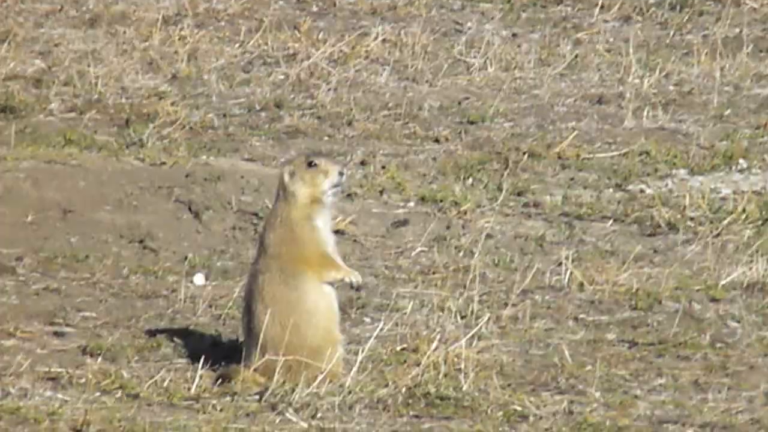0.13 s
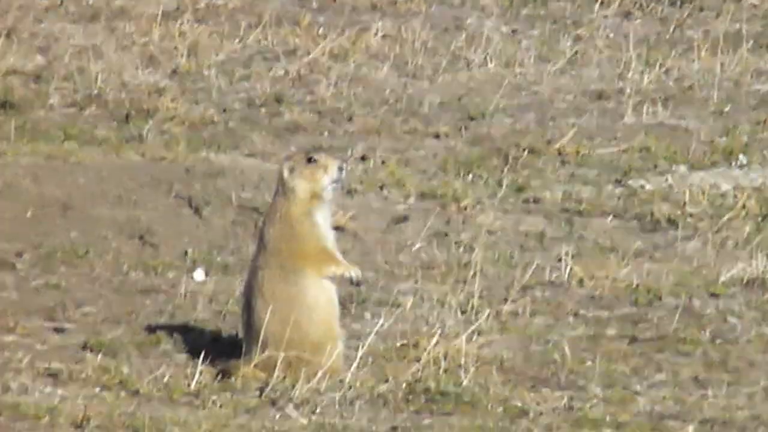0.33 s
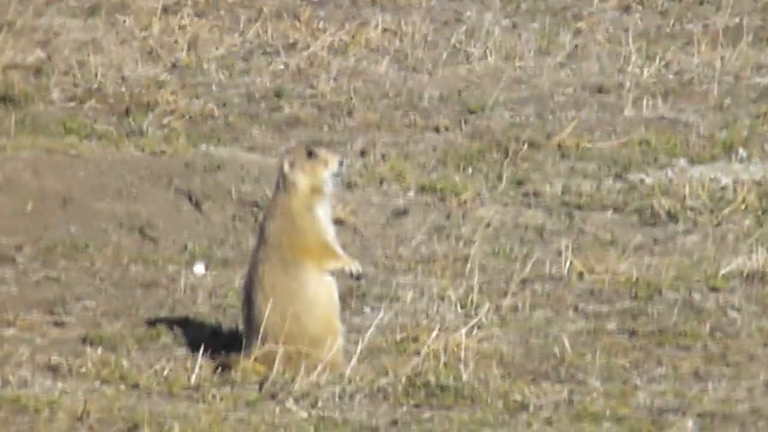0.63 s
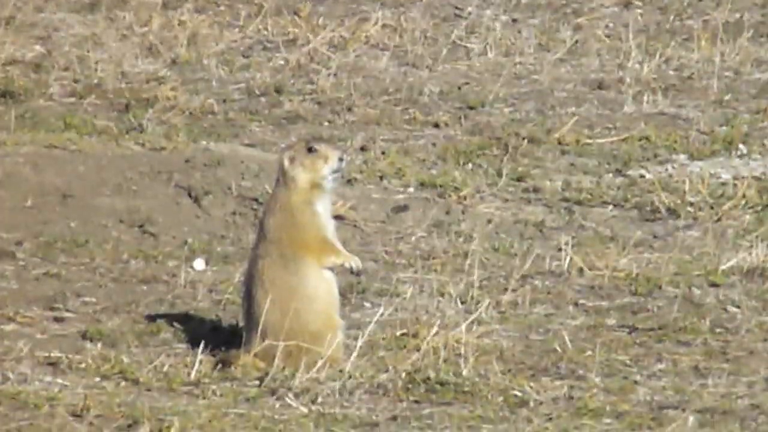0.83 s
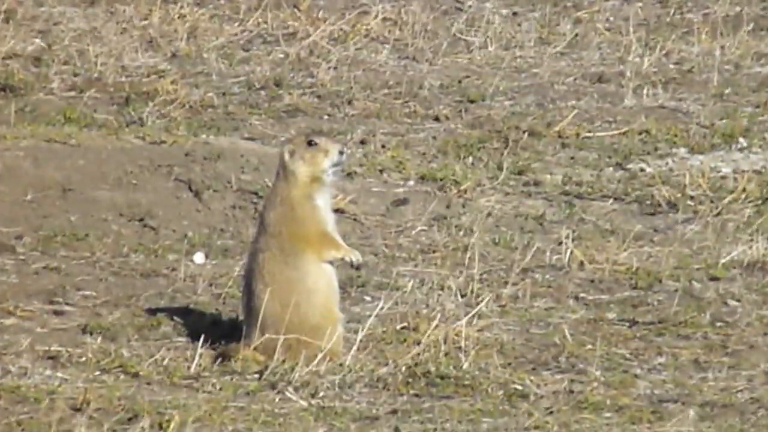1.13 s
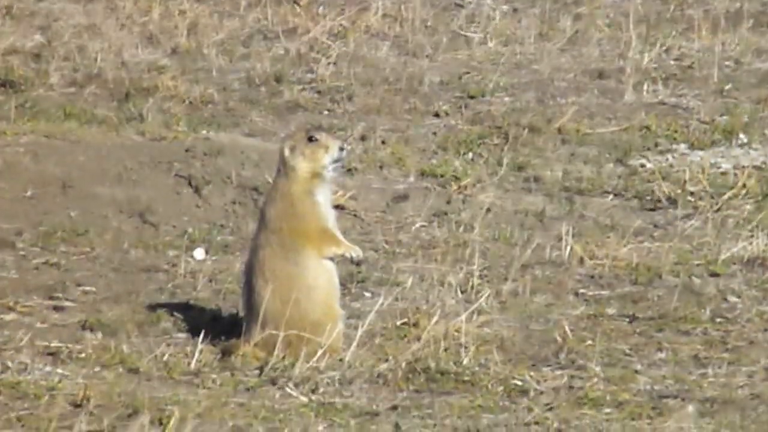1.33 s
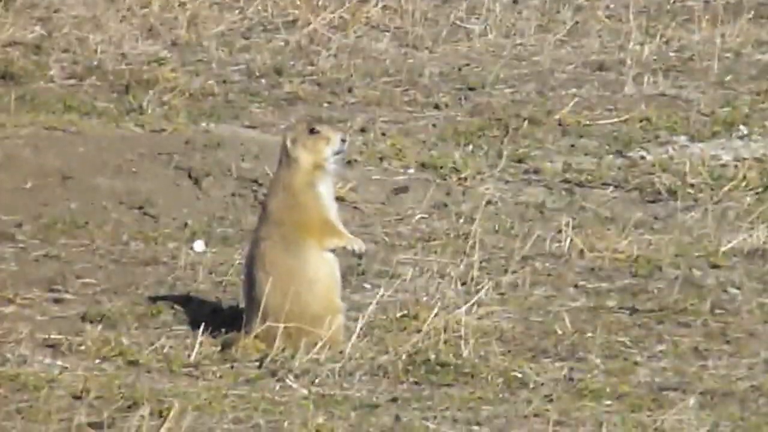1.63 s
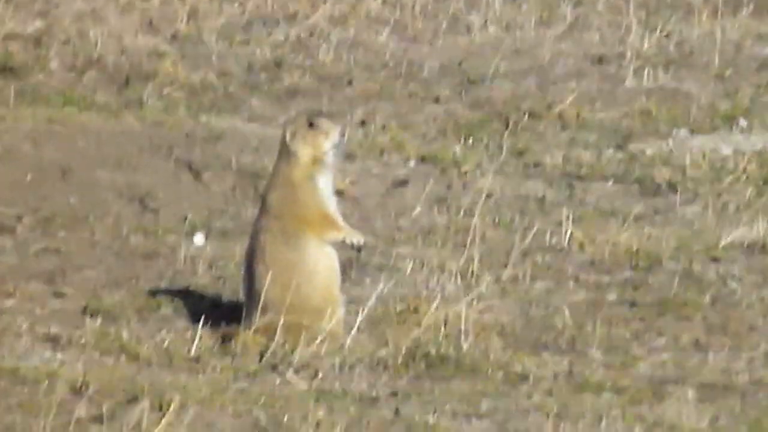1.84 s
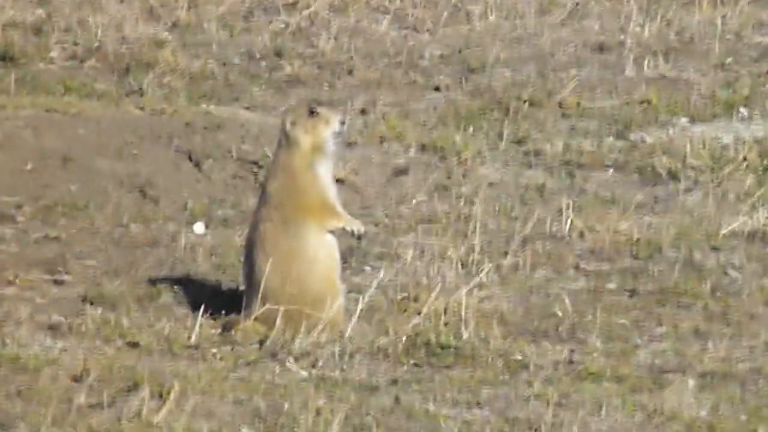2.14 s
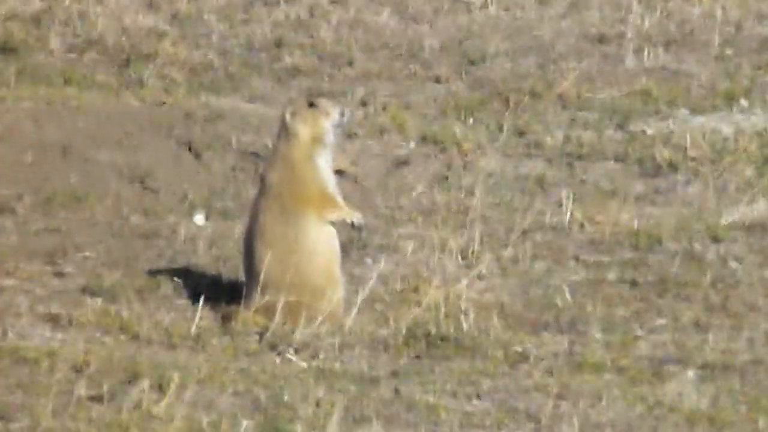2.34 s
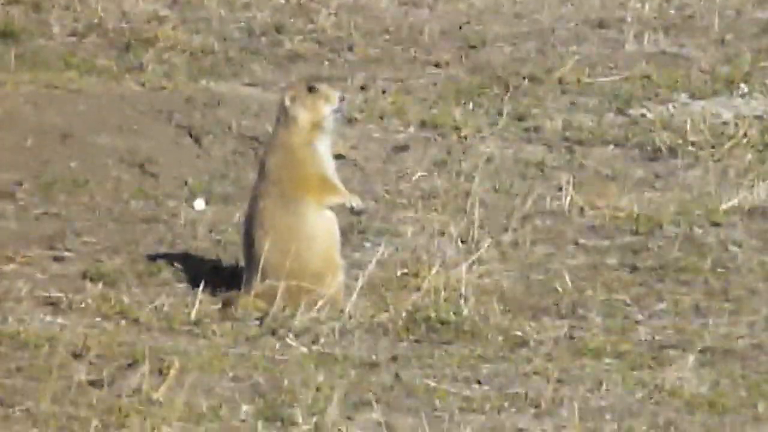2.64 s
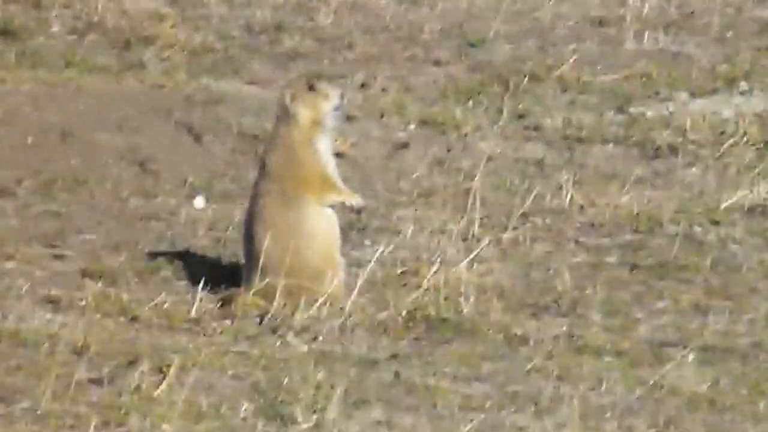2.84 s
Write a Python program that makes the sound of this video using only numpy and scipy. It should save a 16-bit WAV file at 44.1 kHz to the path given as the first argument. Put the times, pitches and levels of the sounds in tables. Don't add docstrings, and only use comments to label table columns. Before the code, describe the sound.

A prairie dog gives a single bright, yelping bark midway, after steady faint chirps from another far away; wind rumbles and hisses at a small handheld camera microphone, with little plastic handling ticks and a finger rub.

```python
import sys
import numpy as np
from scipy import signal
from scipy.fft import rfft, irfft
from scipy.io import wavfile
from scipy.ndimage import uniform_filter1d

SR = 44100
rng = np.random.default_rng(int(sys.argv[2]) if len(sys.argv) > 2 else 0)


def materialize(psi):
    bounded = np.clip(np.atleast_2d(psi).T, -1, 1)
    quanta = np.round(bounded * 32767).astype(np.int16)
    wavfile.write(sys.argv[1], SR, quanta)


def invert_db(level):
    return 10 ** (np.asarray(level, dtype=float) / 20)


N = 131859


def evened(x):
    return x / np.sqrt(np.mean(abs(x) ** 2) + 1e-20)


def read(points, hz):
    f, value = np.transpose(points)
    return np.interp(np.log(hz + 1), np.log(f + 1), value)


def add(mix, s, sound):
    part = mix[round(s * SR):][:len(sound)]
    part += sound[:len(part)]


def ring(x, hz, width):
    turn = np.exp(2j * np.pi * hz * np.arange(len(x)) / SR)
    r = np.exp(-np.pi * width / SR)
    return evened((turn * signal.lfilter([1], [1, -2 * r, r * r], x / turn)).real)


def slow(size, seconds):
    span = max(int(seconds * SR), 2)
    return evened(uniform_filter1d(uniform_filter1d(rng.standard_normal(size), span), span))


def curves(table):
    cols = np.transpose(table)
    t = np.arange(cols[0][0], cols[0][-1], 1 / SR)
    return t[0], [np.interp(t, cols[0], c) for c in cols[1:]]


def phase(hz):
    return 2 * np.pi * np.cumsum(hz) / SR


def bark():
    out = np.zeros(N)
    start, turn = whistle(out)
    second_voice(out, start, turn)
    third_voice(out)
    lingering_cavities(out)
    strained_throat(out)
    return out + ground_scatter(out)


def whistle(out):
    # time in seconds, pitch in Hz, levels of the tone, second and third partial in dB.
    arch = [(1.6462, 1985, -70, -72, -66), (1.6495, 2025, -43, -52, -36), (1.657, 2140, -45, -39, -35.5),
            (1.667, 2225, -52, -33, -43), (1.674, 2275, -28.5, -44, -40), (1.688, 2300, -30, -41, -42),
            (1.697, 2400, -40, -49, -55), (1.707, 2335, -33, -45, -49), (1.714, 2240, -36, -40, -53)]
    tail = [(1.718, 2165, -41, -38, -38), (1.724, 2115, -38, -35, -44), (1.733, 2091, -39, -45, -44),
            (1.758, 2085, -39, -43.5, -42), (1.772, 2054, -38.5, -50, -56), (1.795, 2032, -42.5, -52, -50),
            (1.820, 1986, -43, -54, -59), (1.835, 1920, -56, -56, -72), (1.86, 1830, -70, -64, -85)]
    wobble, flutter_db = .003, .8
    start, (hz, *dbs) = curves(list(arch) + list(tail))
    turn = phase(hz * (1 + wobble * slow(len(hz), .0024)))
    dbs.append(dbs[2] - 15 - 5.4 * ((4 * hz - 8800) / 200) ** 2)
    for k, db in enumerate(dbs):
        level = invert_db(db + flutter_db * (k + .5) * slow(len(hz), .004))
        add(out, start, np.sqrt(2) * level * np.sin((k + 1) * turn))
    return start, turn


def second_voice(out, start, turn):
    # time in seconds, pitch in Hz, level in dB.
    second = [(1.658, 2760, -66), (1.664, 2865, -39), (1.675, 2875, -43), (1.683, 2965, -39),
              (1.691, 3050, -37), (1.699, 3160, -45), (1.712, 2950, -46)]
    sum_db = -13
    begin, (hz, db) = curves(second)
    other = phase(hz)
    first = turn[round((begin - start) * SR):][:len(other)]
    voices = np.sin(other) + invert_db(sum_db) * np.sin(other + first)
    add(out, begin, np.sqrt(2) * invert_db(db) * voices)


def third_voice(out):
    # time in seconds, pitch in Hz, level in dB, level of the sum with the first voice in dB.
    third = [(1.670, 2640, -60, -70), (1.677, 2620, -47, -52), (1.683, 2590, -32, -39),
             (1.692, 2550, -35, -33.5), (1.701, 2640, -29, -34.5), (1.706, 2600, -41, -37),
             (1.713, 2525, -33, -35), (1.719, 2480, -50, -41), (1.728, 2400, -68, -54)]
    rattle_db, double_db = 1.5, -8
    sum_hz, wander_hz = 4838, 45
    begin, (hz, db, sum_db) = curves(third)
    turn, t = phase(hz), np.arange(len(hz)) / SR
    drifts = [slow(len(t), .0017) for _ in range(3)]
    rattle = [invert_db(rattle_db * drift) for drift in drifts]
    tone = rattle[0] * np.sin(turn)
    double = invert_db(double_db) * rattle[1] * np.sin(2 * turn - 2 * np.pi * 130 * t)
    sum_tone = rattle[2] * np.sin(phase(sum_hz + wander_hz * drifts[0]))
    add(out, begin, np.sqrt(2) * (invert_db(db) * (tone + double) + invert_db(sum_db) * sum_tone))


def lingering_cavities(out):
    # start in seconds, length in seconds, frequency in Hz, level in dB.
    linger = [(1.650, .034, 6060, -44), (1.664, .032, 6500, -46), (1.654, .020, 8810, -48),
              (1.666, .016, 5770, -49), (1.672, .022, 9250, -61), (1.698, .022, 7030, -46),
              (1.664, .016, 4470, -43), (1.668, .014, 3540, -47), (1.812, .032, 2570, -55),
              (1.724, .03, 4800, -54)]
    for s, length, hz, db in linger:
        t = np.arange(0, length, 1 / SR)
        level = invert_db(db + 1.5 * slow(SR // 10, .002)[:len(t)])
        swell = np.sin(np.pi * t / length)
        add(out, s, np.sqrt(2) * level * swell * np.sin(2 * np.pi * hz * t))


def strained_throat(out):
    # time in seconds, level of the breath in dB.
    strain = [(1.655, -62), (1.666, -47), (1.686, -39), (1.700, -35), (1.712, -38), (1.720, -49),
              (1.745, -54), (1.80, -62)]
    # resonance in Hz, width in Hz, level in dB.
    throat = [(2750, 700, 0), (4790, 150, -7), (5100, 600, -4), (4400, 400, -8), (5760, 200, -13),
              (6090, 120, -13), (6490, 200, -14), (7270, 200, -17), (3450, 500, -10)]
    begin, (db,) = curves(strain)
    noise = rng.standard_normal(SR // 4)
    breath = sum(invert_db(g) * ring(noise, hz, width) for hz, width, g in throat)
    add(out, begin, invert_db(db) * breath[:len(db)])


def ground_scatter(sound):
    echo_db, echo_t60 = -17, .13
    t = np.arange(SR // 4) / SR
    taps = rng.standard_normal(len(t)) * (rng.random(len(t)) < .03)
    taps = taps * invert_db(-60 * t / echo_t60) * (t > .003)
    return invert_db(echo_db) * signal.fftconvolve(sound, taps / np.linalg.norm(taps))[:N]


def chirps():
    # start in seconds, length in seconds, pitch in Hz, level in dB, brightness in dB.
    calls = [
        (.459, .056, 1850, -44.5, -4),
        (.793, .052, 1845, -47.5, -12),
        (1.116, .045, 1840, -52, -6),
        (1.462, .04, 1840, -54, -4),
        (2.525, .065, 1790, -48, -26),
        (2.872, .055, 1830, -49, -13),
        (.896, .024, 1950, -51, -28),
    ]
    # level of a harmonic in dB, its share of the brightness as a factor.
    partials = [(0, 0), (-5, .4), (-8, .55), (1.5, 1.1), (-18, 1.1)]
    bend, edge_s = .0736, .011
    out = np.zeros(N)
    for s, length, hz, db, bright in calls:
        t = np.arange(0, length, 1 / SR)
        edge = np.clip(np.minimum(t, length - t) / edge_s, 0, 1)
        arch = 1 - bend * ((2 * t - .94 * length) / .0485) ** 2 * np.exp(bright / 20)
        turn = phase(hz * arch)
        for k, (g, share) in enumerate(partials):
            level = invert_db(db + g + share * bright + 2.4 * slow(SR // 10, .0063)[:len(t)])
            add(out, s, edge * np.sqrt(2) * level * np.sin((k + 1) * turn))
    return out


def bird():
    # time in seconds, pitch in Hz, level in dB.
    warble = [(2.845, 770, -74), (2.868, 797, -60), (2.885, 825, -67), (2.902, 845, -66), (2.920, 770, -59),
              (2.930, 765, -74), (2.945, 840, -64), (2.965, 880, -63), (2.995, 900, -60)]
    # multiple of the pitch, level in dB.
    partials = [(2, 0), (3, -5), (4, 0), (5, -8), (6, -6)]
    out = np.zeros(N)
    start, (hz, db) = curves(warble)
    turn = phase(hz)
    for k, g in partials:
        level = invert_db(db + g + 3.5 * slow(len(hz), .004))
        add(out, start, np.sqrt(2) * level * np.sin(round(k) * turn))
    return out


def snaps():
    # time in seconds, peak in dB, centre in Hz, width in Hz.
    bursts = [
        (1.655, -48, 8600, 2500),
        (.887, -54, 13800, 2000),
        (.887, -55, 5500, 3500),
        (.580, -52, 8500, 1500),
        (1.027, -50, 8400, 1500),
        (2.353, -55, 5150, 500),
        (2.352, -55, 9000, 900),
        (2.363, -54, 5200, 600),
    ]
    snap_s = .004
    out, t = np.zeros(N), np.arange(SR // 50) / SR
    for s, db, hz, width in bursts:
        envelope = 2 * t / snap_s * np.exp(1 - 2 * t / snap_s)
        noise = ring(rng.standard_normal(len(t)), hz, width)
        add(out, s - snap_s / 2, invert_db(db) * envelope * noise)
    return out


def camera():
    return motor() + case_ticks() + finger_rub()


def motor():
    # frequency in Hz, width in Hz, level in dB.
    whine = [(210, 25, -54), (340, 8, -53), (677, 30, -60), (2580, 40, -65), (6297, 40, -80),
             (6697, 40, -80), (8387, 70, -78), (10045, 60, -72), (13410, 90, -72)]
    swell_db = 1.5
    noise = rng.standard_normal(N)
    return sum(invert_db(db + swell_db * slow(N, .038)) * ring(noise, hz, width) for hz, width, db in whine)


def case_ticks():
    # start in seconds, peak in dB, frequency in Hz, 60 dB decay in seconds.
    ticks = [
        (.8605, -26, 1180, .02),
        (.9566, -30, 1200, .013),
        (1.1606, -33, 1000, .012),
        (1.2674, -32, 1100, .013),
        (1.4265, -25.5, 1150, .018),
        (.762, -31, 820, .04),
        (2.347, -29, 305, .17),
        (2.775, -34, 205, .5),
    ]
    out, t = np.zeros(N), np.arange(SR // 4) / SR
    for s, db, hz, t60 in ticks:
        rise = np.minimum(20 * t / t60, 1)
        add(out, s, invert_db(db - 60 * t / t60) * rise * np.sin(2 * np.pi * hz * t))
    return out


def finger_rub():
    # frequency in Hz, width in Hz, level in dB.
    shell = [(520, 200, 0), (1000, 900, -7), (5100, 600, -17), (8500, 3500, -15), (3000, 2500, -16)]
    start_s, peak_db, rise_s, t60 = 2.343, -31, .010, .17
    out, t = np.zeros(N), np.arange(SR // 4) / SR
    grit = rng.standard_normal(len(t)) * invert_db(2 * slow(len(t), .001))
    scrape = sum(invert_db(g) * ring(grit, hz, width) for hz, width, g in shell)
    scrape = signal.sosfilt(signal.butter(4, 200, 'high', fs=SR, output='sos'), scrape)
    add(out, start_s, invert_db(peak_db - 60 * t / t60) * np.minimum(t / rise_s, 1) * scrape)
    return out


def wind():
    # frequency in Hz, level in dB.
    rumble = [(25, -31), (80, -27), (105, -14.5), (200, -3), (290, -5), (400, -1.5), (1000, -8),
              (1500, -14.5)]
    hiss = [(1500, -12), (1850, 1.5), (2150, -5.5), (3500, -10), (7000, -13.5), (13000, -16),
            (15600, -20.5)]
    # time in seconds, strength of the wind in dB.
    gusts = [(.16, -41), (.35, -41.5), (.62, -38.5), (1.0, -41), (1.5, -40.5), (1.9, -40.5), (2.25, -38.5),
             (2.45, -39.5), (2.8, -40), (2.99, -40)]
    rumble_db, hiss_db = -40, -48.5
    patch_db, flicker_db, hiss_follow = .5, .5, .043
    frames, hz = N // 512 + 5, np.fft.rfftfreq(2048, 1 / SR)
    a, b, c, d, patches = rng.standard_normal((frames, 1025, 5)).T
    patches = evened(uniform_filter1d(uniform_filter1d(patches, size=12, axis=0), size=4, axis=1))
    flicker = evened(uniform_filter1d(rng.standard_normal(frames), 2))
    s, db = np.transpose(gusts)
    gust = np.interp(np.arange(frames) * 512 / SR, s, db - db.mean())

    low_db = read(rumble, hz) - 15 * np.log2(np.maximum(hz / rumble[-1][0], 1))
    high_db = read(hiss, hz) + 8.8 * np.log2(np.clip(hz / hiss[0][0], .01, 1))
    low = (a + 1j * b) * invert_db(low_db)[:, None]
    low = low * invert_db(gust + patch_db * patches + flicker_db * flicker)
    high = (c + 1j * d) * invert_db(high_db)[:, None]
    high = high * invert_db(hiss_follow * gust + .72 * patches)
    out = np.zeros(N)
    for spectrum, level_db in ((low, rumble_db), (high, hiss_db)):
        noise = signal.istft(spectrum, nperseg=2048, noverlap=1536)[1][:N]
        out += invert_db(level_db) * evened(noise)
    return out


def slips():
    # time in seconds, centre in Hz, width in Hz.
    puffs = [(.279, 11800, 1400), (.65, 5800, 1200), (.65, 9700, 1400), (1.254, 8300, 1400),
             (1.254, 13800, 1400), (2.043, 15200, 1200), (2.183, 4700, 1000), (2.183, 8600, 2100),
             (2.531, 6600, 2000), (2.531, 13800, 1400), (2.856, 6300, 1400)]
    out, hz = np.zeros(N), np.fft.rfftfreq(2048, 1 / SR)
    for s, centre, width in puffs:
        band = abs(hz - centre) < width / 2
        puff = irfft(rfft(rng.standard_normal(2048)) * band)
        add(out, s - 1024 / SR, invert_db(-64) * evened(puff) * np.hanning(2048) ** 2)
    return out


def scene():
    mono = bark() + chirps() + bird() + snaps() + camera() + wind()
    side = slips()
    return np.array([mono + side, mono - side])


def band_limit(x):
    return signal.sosfilt(signal.butter(12, 15720, fs=SR, output="sos"), x)


def record(dry):
    notch_hz, notch_width, notch_depth = 7875, 90, .9
    start_s = .1503
    hz = np.fft.rfftfreq(N, 1 / SR)
    notch = 1 - notch_depth * np.exp(-((hz - notch_hz) / notch_width) ** 2)
    heard = irfft(rfft(dry) * notch, N)
    return band_limit(heard * (np.arange(N) >= start_s * SR))


dry = scene()
out = record(dry)
materialize(out)
```